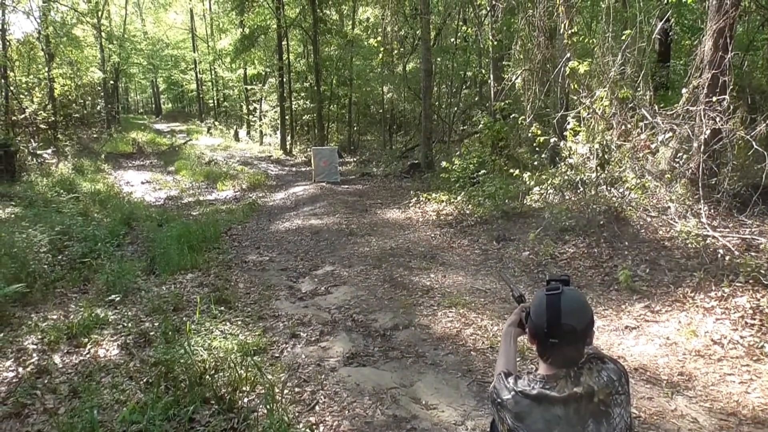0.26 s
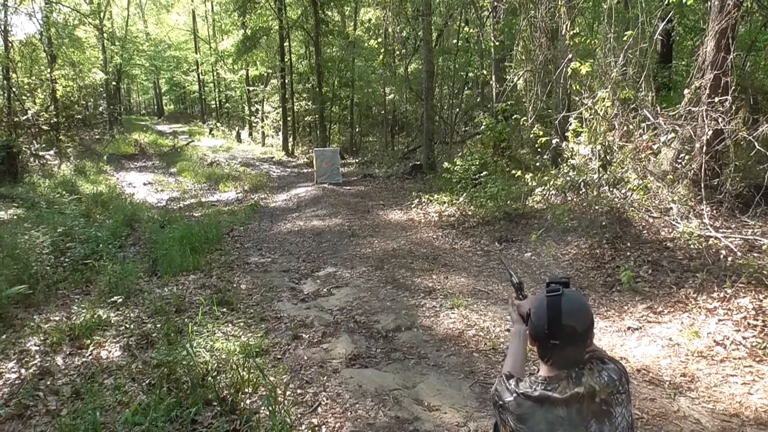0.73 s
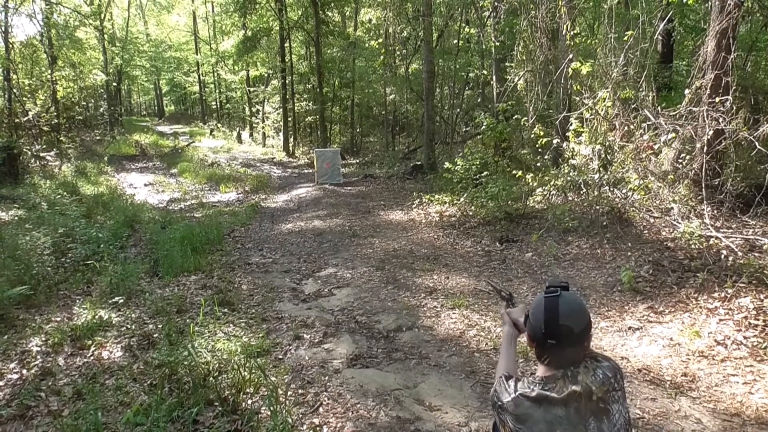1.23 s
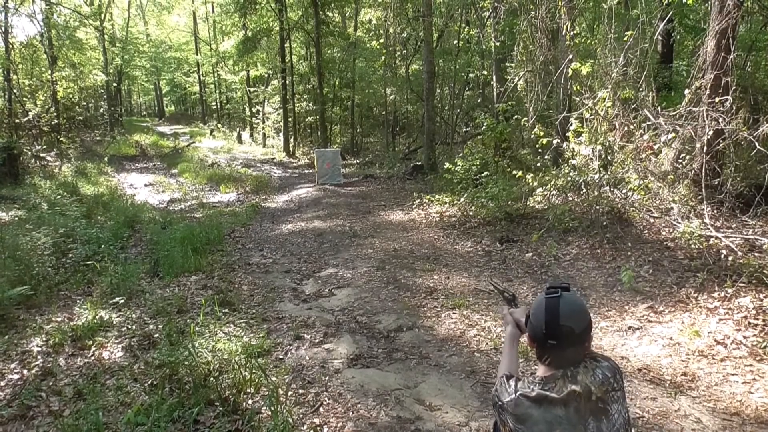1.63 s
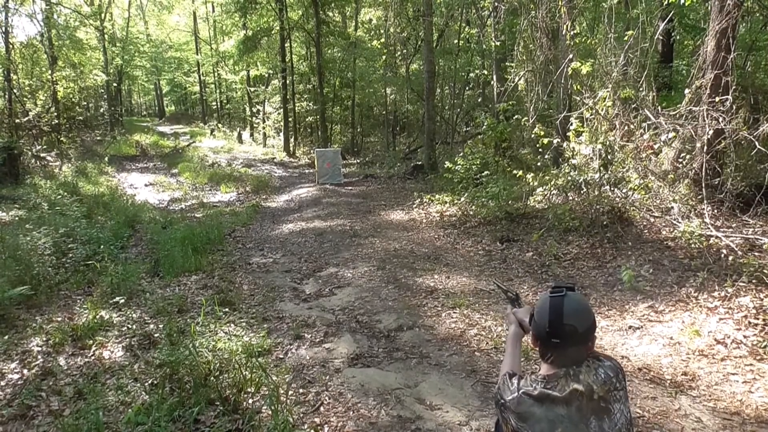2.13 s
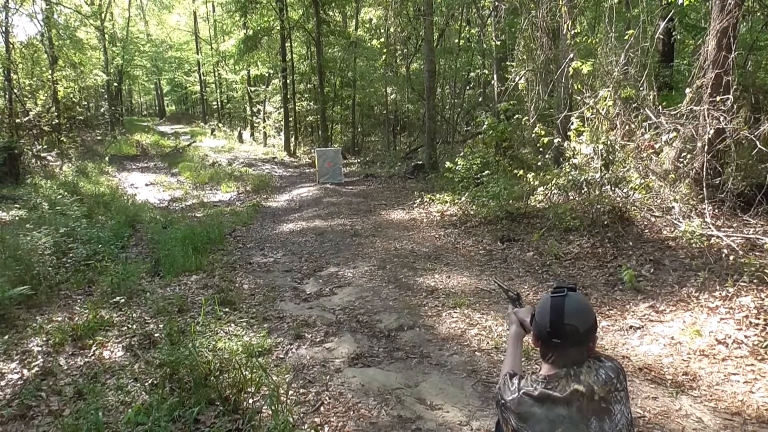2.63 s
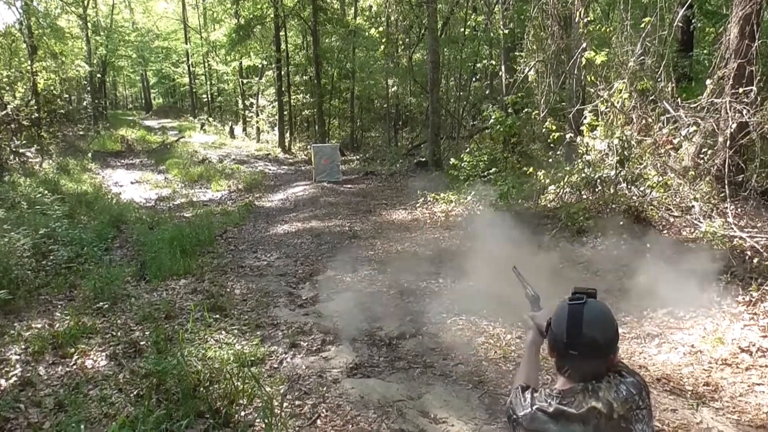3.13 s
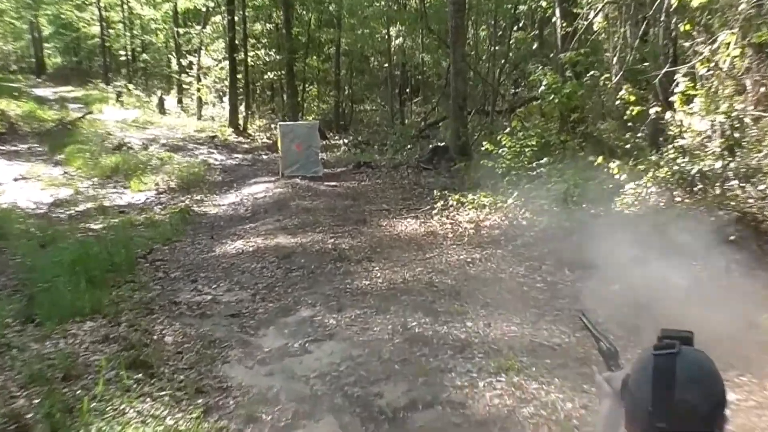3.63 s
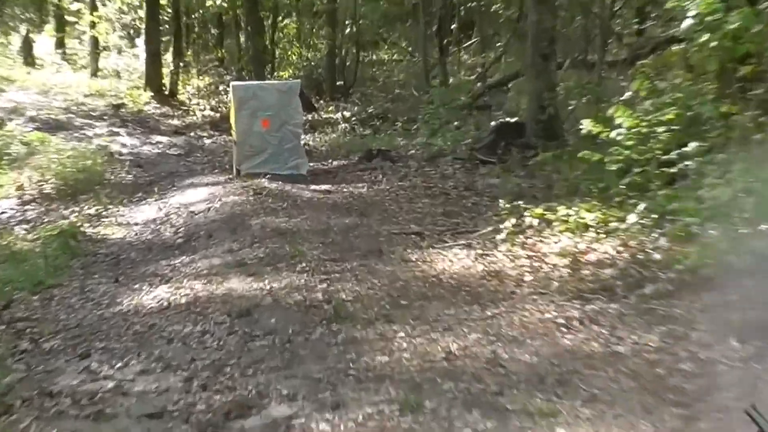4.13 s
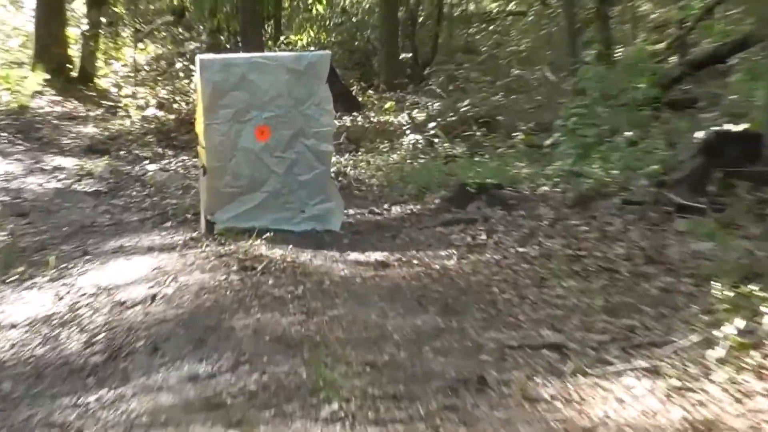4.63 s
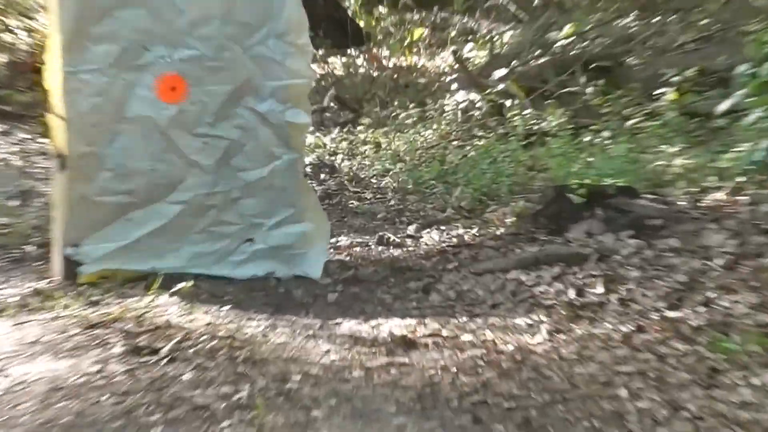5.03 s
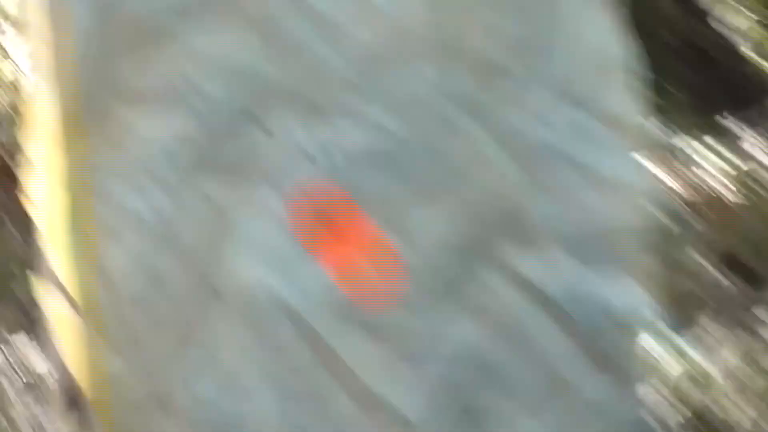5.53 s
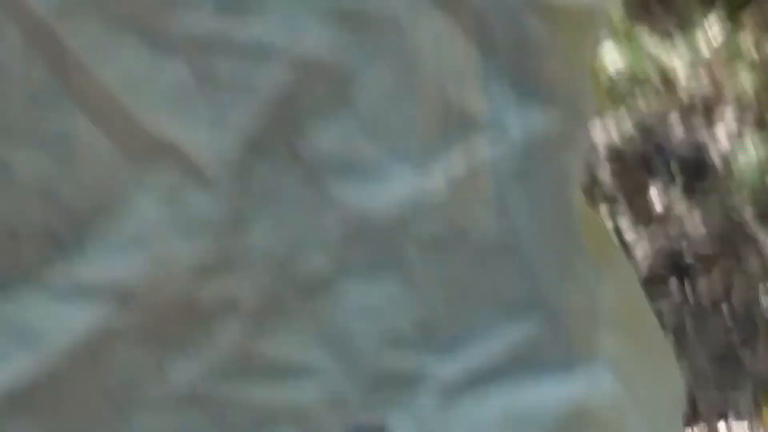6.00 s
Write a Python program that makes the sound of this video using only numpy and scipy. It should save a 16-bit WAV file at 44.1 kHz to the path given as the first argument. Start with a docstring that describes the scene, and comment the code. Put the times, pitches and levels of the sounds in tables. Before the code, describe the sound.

Quiet woodland with a low, distant rush and very faint steady hiss. Right at the start a black powder revolver close by, slightly right, is cocked: a light click at 0.0 s, a harder, bright steel snap at 0.2 and a smaller click at 0.3, with brief metallic ringing. A small bird gives thin, quick rising chips at 0.3, 1.5 and 2.5 s, smeared among the trees; barely audible ticks and scuffs come between. At 3.05 s a single hard, sharp bang erupts, slightly saturated, followed by dense scatter from near trunks and distinct slaps over the next second. The forest's roll swells around 3.45 and 3.8 s, loses treble and sinks into a bassy rumble that fades slowly. Bird chips return at 4.1, 4.7, 5.4 and 6.0 s. Over the dying echo the revolver is cocked again, three quick clicks from 5.37 to 5.55 s.

```python
"""A low, distant rush is heard first, and close over it a black powder revolver is cocked on a woodland track.
Each contact of its lock is an impact: a decaying ping, noise bursts and the ringing modes of the frame.
A small bird chips high in the trees as short rising sweeps, smeared by diffuse scattering; small ticks and
scuffs are brief noise bursts. One shot sends out a pressure pulse with distinct echoes; shaped noise gives the
near scatter, and the deep forest's roll that grows duller with distance. The revolver is then cocked again."""
import sys
import numpy as np
from scipy import signal
from scipy.fft import rfft, irfft, next_fast_len
from scipy.io import wavfile
from scipy.ndimage import map_coordinates

SR = 44100
rng = np.random.default_rng(int(sys.argv[2]) if len(sys.argv) > 2 else 0)


def pcm_store(signal):
    """Save signal as 16-bit PCM."""
    levels = np.round(np.clip(np.atleast_2d(signal), -1, 1) * 32767)
    wavfile.write(sys.argv[1], SR, levels.astype(np.int16).T)


N = 276066
SHOT_S = 3.0542  # the charge fires


def amp(db):
    """Level to amplitude: 20 dB is a factor of ten."""
    return 10 ** (np.asarray(db) / 20)


def unit(x):
    """Normalisation of signal power: rms 1."""
    return x / np.sqrt(np.mean(x ** 2) + 1e-20)


def along(points, hz):
    """Interpolation of (frequency_hz, value) points on a logarithmic frequency axis."""
    point_hz, value = np.transpose(points)
    return np.interp(np.log(hz + 1), np.log(point_hz + 1), value)


def clock():
    """Sampling: the time of each sample in seconds."""
    return np.arange(N) / SR


def since_shot():
    """Elapsed time: seconds since the charge fired, zero before."""
    return np.maximum(clock() - SHOT_S, 0)


def wobble(rate):
    """Random fluctuation: a smooth curve through random knots, rate knots a second."""
    knots = rng.standard_normal(int(N * rate / SR) + 4)
    return map_coordinates(knots, [np.arange(N) * rate / SR])


def filtered(x, response):
    """Linear filtering: the spectrum of x times a response of frequency."""
    n = x.shape[-1]
    m = next_fast_len(n + SR // 8)
    spectrum = rfft(x, m) * response(np.fft.rfftfreq(m, 1 / SR))
    return irfft(spectrum, m)[..., :n]


def add(track, s, sound):
    """Superposition: mix a sound into the track at time s."""
    room = track[..., max(round(s * SR), 0):][..., :sound.shape[-1]]
    room += sound[..., :room.shape[-1]]


def rush(spectrum, alike, size=N):
    """Partly coherent noise: stereo of rms 1 with a given colour and left-right likeness."""
    def mid_side(hz):
        angle = np.arccos(np.clip(along(alike, hz), -1, 1)) / 2
        return amp(along(spectrum, hz)) * [np.cos(angle), np.sin(angle)]

    mid, side = filtered(rng.standard_normal((2, size)), mid_side)
    return unit(np.array([mid + side, mid - side]))


def trees(x, t60):
    """Diffuse scattering: the trunks answer a small sound with a decaying tail, different at each ear."""
    t = np.arange(SR) / SR
    tail = rng.standard_normal((2, SR)) * amp(-60 * t / t60)
    tail = tail / np.linalg.norm(tail[0])
    return signal.fftconvolve(np.atleast_2d(x), tail, axes=1)[:, :N]


# colour of the distant rush: frequency_hz, relative_level_db (per Hz)
RUSH_COLOUR = [(20, -30), (45, -15), (80, -3), (145, -1), (185, -4), (400, -4.5), (700, -6.5), (1000, -11),
               (1300, -14), (1700, -24.5), (2300, -39), (4000, -72)]
# colour of the hiss: frequency_hz, relative_level_db (per Hz)
HISS_COLOUR = [(1400, -27), (2000, 3.5), (2700, -3), (4000, 2.5), (5700, -3.5), (8000, 0.5), (10000, -1),
               (13000, -6.5), (16000, -13)]
# coherence of rush and hiss between the ears: frequency_hz, likeness (0 to 1)
AIR_COHERENCE = [(60, 1), (180, 0.9), (550, 0.75), (1650, 0.41), (4970, 0.35), (15000, 0.04)]
AIR_DB = -50.1
AIR_SETTLE_DB, AIR_SETTLE_S = 2.3, .3  # the rush is a little louder at first and settles


def air(hiss_db=-61.5):
    """Broadband noise: a low, distant rush with a faint, steady hiss above it."""
    level_db = AIR_DB + AIR_SETTLE_DB * np.exp(-clock() / AIR_SETTLE_S) + 0.26 * wobble(9)
    low_rush = amp(level_db) * rush(RUSH_COLOUR, AIR_COHERENCE)
    hiss = amp(hiss_db) * rush(HISS_COLOUR, AIR_COHERENCE)
    return (low_rush + hiss) * amp([[-.25], [.25]])  # slightly to the right


# each cocking makes three clicks: first_notch_s, second_notch_s, cylinder_bolt_s, strength_db
COCKING_CLICKS = [(.0190, .2122, .3181, 0), (5.3743, 5.4744, 5.5470, -.5)]
# impact of each part of the lock: rattle_db, ping_db, ping_hz, t60_s, knock_db
FIRST_NOTCH_IMPACT = (-21.5, -25.5, 7500, .014, -44.5)
SECOND_NOTCH_IMPACT = (-13.5, -2, 11800, .0052, -34)
BOLT_IMPACT = (-24.5, -27, 11300, .02, -38)
HAMMER_IMPACT = (-20, -33, 8500, .017, -40)
BOLT_TOUCH_S, BOLT_TOUCH_DB = .0035, -8  # the bolt touches lightly just before it seats
IGNITION_S = .0058  # from hammer fall to shot


def contacts():
    """Discrete impacts: every contact in the lock, as (start_s, strength_db, part)."""
    hits = [(SHOT_S - IGNITION_S, 0, HAMMER_IMPACT)]
    for first, second, bolt, db in COCKING_CLICKS:
        hits.append((first, db, FIRST_NOTCH_IMPACT))
        hits.append((second, db, SECOND_NOTCH_IMPACT))
        hits.append((bolt - BOLT_TOUCH_S, db + BOLT_TOUCH_DB, BOLT_IMPACT))
        hits.append((bolt, db, BOLT_IMPACT))
    return hits


# ringing modes of the steel frame: frequency_hz, level_db, t60_s
FRAME_MODES = [(3150, -28, .04), (3500, -30, .05), (4600, -30, .04), (8350, -16.5, 0.073),
               (11500, -27, 0.088), (12870, -32, .1), (14650, -17, .026)]
# colour of the rattling steel action: frequency_hz, relative_level_db (per Hz)
RATTLE_COLOUR = [(500, -39), (1800, -22), (2200, -14), (2700, -15), (3400, -4), (4600, -7.5), (5500, -12.5),
                 (7200, 6.5), (11500, 5), (13500, 0), (16000, -18)]
# colour of the duller knock of hammer and grip: frequency_hz, relative_level_db (per Hz)
KNOCK_COLOUR = [(150, -23), (500, -6), (1300, -6), (2100, 1), (2700, -3.5), (3800, 0), (7000, -11),
                (16000, -39)]


def lock(after_db=-22.5, after_t60=0.056, ring_db=-5.5, wet_db=-6.5, ping_wet_db=-22, tail_t60=0.4,
         leaf_hz=10000):
    """Impact excitation: steel snaps home with a hard ping, a rattle, a knock in the grip and modal ringing."""
    pings, action, t = np.zeros(N), np.zeros((2, N)), np.arange(SR // 5) / SR
    for s, db, (rattle_db, ping_db, ping_hz, t60, knock_db) in contacts():
        strike = amp(-60 * t / t60)
        rattle = amp(rattle_db) * rush(RATTLE_COLOUR, [(1000, 0.64)], size=len(t))
        knock = amp(knock_db) * rush(KNOCK_COLOUR, [(1000, 0.91)], size=len(t))
        settling = amp(after_db - 60 * t / after_t60)  # loose parts settle
        noise = (rattle + knock) * (strike + settling)
        ring = np.zeros(len(t))
        for hz, level, life in FRAME_MODES:
            mode_db = level + rng.normal(0, 0.95)  # each contact excites the modes a little differently
            ring += amp(mode_db - 60 * t / life) * np.sin(2 * np.pi * hz * t)
        contact = amp(db) * (1 - np.exp(-t / 0.000061))  # very short onset
        add(pings, s, amp(ping_db) * contact * strike * np.sin(2 * np.pi * ping_hz * t))
        add(action, s, contact * (noise + amp(rattle_db + ring_db) * ring))
    # foliage swallows most of the high pings
    scattered = filtered(action.mean(0), lambda hz: amp(wet_db) / np.sqrt(1 + (hz / leaf_hz) ** 4))
    scattered = scattered + amp(ping_wet_db) * pings
    direct = (pings + action) * amp([[-.7], [.7]])  # slightly to the right
    return direct + trees(scattered, tail_t60)


# bird chips, all the same quick upward sweep: start_s, level_db
CHIP_NOTES = [(.339, -42), (1.487, -44.5), (2.495, -41.5), (4.114, -39), (4.729, -37.5), (5.429, -43),
              (5.99, -39.5)]
# shape of a chip: start_hz, top_hz, length_s
CHIP_SHAPE = (6080, 8550, .017)
# a softer, flatter lisp leads into some chips: start_s, level_db
LISP_NOTES = [(2.359, -52), (3.98, -54)]
# shape of a lisp: start_hz, top_hz, length_s
LISP_SHAPE = (7400, 7900, .045)


def bird(direct_db=-18, tail_t60=0.94, bend=1.36):
    """Frequency modulation: thin rising chips and lisps, heard mostly as their smear among the trees."""
    song = np.zeros(N)
    for notes, (start_hz, top_hz, length) in ((CHIP_NOTES, CHIP_SHAPE), (LISP_NOTES, LISP_SHAPE)):
        u = np.linspace(0, 1, int(length * SR))
        pitch_hz = top_hz - (top_hz - start_hz) * (1 - u) ** bend  # the rise slows near its top
        swell = np.sqrt(np.abs(np.sin(np.pi * u)))
        note = swell * np.sin(2 * np.pi * np.cumsum(pitch_hz) / SR)
        for s, db in notes:
            add(song, s, amp(db) * note)
    return amp(direct_db) * song + trees(song, tail_t60)


# small ticks and scuffs: start_s, level_db, length_s
TICKS_AND_SCUFFS = [(0.543, -56, 0.0035), (0.906, -55, .001), (2.619, -53.5, 0.017), (2.796, -52.5, 0.014),
                    (2.889, -54.5, 0.0087), (3.247, -20, 0.00075), (4.618, -33, 0.0001)]
# colour of the ticks and scuffs: frequency_hz, relative_level_db (per Hz)
TICK_COLOUR = [(200, -6), (900, 12), (2000, -2), (4000, -5.5), (9000, -5), (16000, -15)]


def ticks_and_scuffs(dull_cycles=140):
    """Duration sets bandwidth: small ticks and scuffs of noise, duller the longer they last."""
    out, t = np.zeros((2, N)), np.arange(SR // 5) / SR
    for s, db, length in TICKS_AND_SCUFFS:
        u = t / max(length, 1e-4)
        noise = rush(TICK_COLOUR, [(1000, .7)], size=len(t))
        grit = filtered(noise, lambda hz: 1 / np.hypot(1, hz * length / dull_cycles))
        add(out, s, amp(db) * u * np.exp(1 - u) * grit)
    return out


# the blast, then its distinct echoes from ground and big trees: start_s, peak_db (before filtering), push_s
BLAST_WAVES = [(3.0558, 6, .00036), (3.0625, 0, .0019), (3.0875, 3.5, .0005), (3.133, 1.5, .00075),
               (3.239, -4, .0005), (3.421, -4, .0007), (3.54, -5.5, .0016), (3.8, -9, .0012),
               (4.077, -11.5, .00086)]


def blast(soft_hz=1100, low_hz=90, ear_s=0.00042):
    """Blast wave and reflection: a sudden push and a longer suction, rounded by the soft ground."""
    out, t = np.zeros((2, N)), np.arange(SR // 20) / SR
    for k, (s, db, push) in enumerate(BLAST_WAVES):
        u = t / max(push, 1e-4)
        wave = amp(db) * (1 - u) * np.exp(-u)
        # the direct wave comes from ahead, each echo from its own side
        lag = ear_s * rng.uniform(-1.15, 1) * (k > 0)
        add(out[0], s - lag, wave)
        add(out[1], s + lag, wave)
    out = signal.sosfilt(signal.butter(2, soft_hz, fs=SR, output="sos"), out)
    return signal.sosfilt(signal.butter(4, low_hz, "high", fs=SR, output="sos"), out)


# colour of the near scatter: frequency_hz, relative_level_db (per Hz)
CRASH_COLOUR = [(55, -44), (110, -15), (230, 1), (380, -10.5), (720, -1.5), (1300, -8.5), (2000, -13.5),
                (5500, -17.5), (8000, -9.5), (11000, -11.5), (16000, -22)]
# coherence of the near scatter between the ears: frequency_hz, likeness (0 to 1)
NEAR_COHERENCE = [(100, 0.59), (600, 0.52), (2000, 0.61), (5000, 0.23), (15000, 0.11)]
NEAR_DB, NEAR_FALL_DB_PER_S = -12.8, 97  # scatter from leaves and near trunks
NEAR_HOLD_S, NEAR_T60_S = .08, .17  # once the nearest trees have answered, it dies quickly


def crash(crack_db=6, crack_s=0.0035, attack_s=0.00077, sizzle_db=-23, sizzle_t60=1.0, sizzle_hz=6000,
          sizzle_top_hz=10800):
    """Multiple scattering: the muzzle's crack runs into dense scatter from near trunks; leaves sizzle on."""
    age = since_shot()
    crack = crack_db * np.exp(-age / crack_s)
    level_db = NEAR_DB - NEAR_FALL_DB_PER_S * age + crack + 1.0 * wobble(250)
    fade_db = -60 * np.maximum(age - NEAR_HOLD_S, 0) / NEAR_T60_S
    trunks = amp(level_db + fade_db) * rush(CRASH_COLOUR, NEAR_COHERENCE)

    def treble_band(hz):
        return hz ** 4 / (hz ** 4 + sizzle_hz ** 4) / np.hypot(1, (hz / sizzle_top_hz) ** 6)

    leaves = unit(filtered(rush(CRASH_COLOUR, NEAR_COHERENCE), treble_band))
    sizzle = amp(sizzle_db - 60 * age / sizzle_t60) * leaves
    return np.clip(age / attack_s, 0, 1) * (trunks + sizzle)


# colour of the roll as it first returns: frequency_hz, relative_level_db (per Hz)
ROLL_COLOUR = [(70, -37), (120, -8.5), (165, 3.5), (235, -.5), (330, -4.5), (550, -1.5), (1200, -1.5),
               (1750, -12), (2200, -10), (2750, -14.5), (3800, -10), (8500, -9.3), (11000, -15.5),
               (16000, -36)]
# coherence of the far echoes between the ears: frequency_hz, likeness (0 to 1)
FAR_COHERENCE = [(60, 1), (130, 1), (260, 0.93), (640, 0.8), (1410, 0.58), (3100, 0.64), (6820, 0.22),
                 (15000, 0.18)]
# loss in air and foliage: frequency_hz, loss_db_per_s
ABSORPTION = [(100, 2), (200, 2.5), (600, -2), (1200, 1), (2200, 5.5), (4200, 19), (8000, 35.5),
              (16000, 66)]
# dense stands of trees send back swells: delay_s (after the shot), lift_db, half_width_s
TREE_STANDS = [(.39, 4.7, .105), (.77, 2.3, .07)]
ROLL_DB, ROLL_HOLD_S, ROLL_FALL_DB_PER_S = -22.7, .83, 22  # the forest's answer holds, then fades
LINGER_DB, LINGER_FALL_DB_PER_S = -14, 10  # a weak share of it lingers among the farthest trees


def roll(build_s=0.046, clump_db=0.4, lump_db=0.9, swell_hz=4000):
    """Reverberation with absorption: countless trunks echo; later echoes crossed more air and lost treble."""
    hz, t, z = signal.stft(rush(ROLL_COLOUR, FAR_COHERENCE), SR, nperseg=512)
    travel = np.maximum(t - SHOT_S, 0)
    loss_db = along(ABSORPTION, hz)[:, None] * travel
    swell_db = sum(lift * np.exp(-((travel - delay) / width) ** 2) for delay, lift, width in TREE_STANDS)
    dull = 1 / np.hypot(1, hz / swell_hz)[:, None]  # the stands send back little treble
    echoes = signal.istft(z * amp(dull * swell_db - loss_db), SR, nperseg=512)[1][:, :N]
    age = since_shot()
    late = np.maximum(age - ROLL_HOLD_S, 0)
    fade = np.hypot(amp(-ROLL_FALL_DB_PER_S * late), amp(LINGER_DB - LINGER_FALL_DB_PER_S * late))
    uneven_db = clump_db * wobble(120) + lump_db * wobble(25)  # echoes arrive in clumps
    build = np.clip(age / build_s, 0, 1) ** 2
    return build * fade * amp(ROLL_DB + uneven_db) * echoes


# colour of the boom: frequency_hz, relative_level_db (per Hz)
BOOM_COLOUR = [(25, -34), (45, -24), (75, -4.5), (130, 4.5), (200, -5), (300, -23), (600, -72)]
BOOM_DB, BOOM_RISE_S, BOOM_FALL_DB_PER_S = -37, .68, 15  # the bass swells late and fades slowly


def boom(swell_power=1.6):
    """Build-up and exponential decay: bass gathers as the wave reaches ever more trees, then fades evenly."""
    age = since_shot()
    rise = np.clip(age / BOOM_RISE_S, 0, 1) ** swell_power
    level_db = BOOM_DB - BOOM_FALL_DB_PER_S * np.maximum(age - BOOM_RISE_S, 0)
    return rise * amp(level_db) * rush(BOOM_COLOUR, FAR_COHERENCE)


def scene():
    """Superposition: the quiet woods, the lock, and the shot with its echoes."""
    return air() + lock() + bird() + ticks_and_scuffs() + blast() + crash() + roll() + boom()


TOP_HZ = 16000  # band limit of the recorder


def record(dry):
    """Saturation and band limiting: the recorder rounds off the highest peaks and cuts the top treble."""
    rounded = dry / (1 + np.abs(dry / .95) ** 6) ** (1 / 6)
    return filtered(rounded, lambda hz: np.clip((TOP_HZ - hz) / 400 + .5, 0, 1))


dry = scene()
out = record(dry)
pcm_store(out)
```